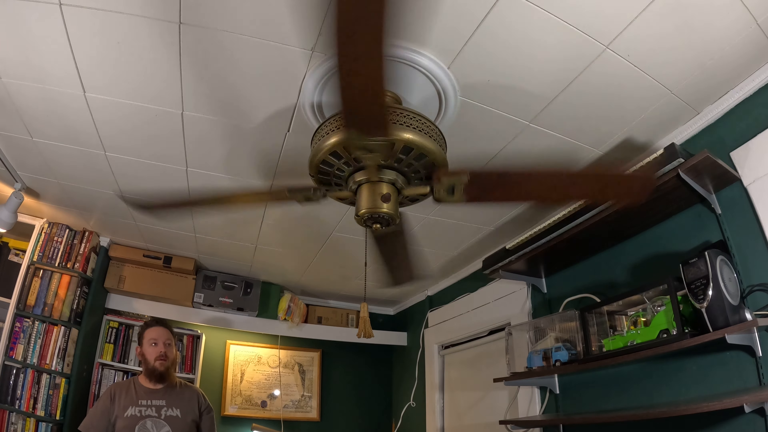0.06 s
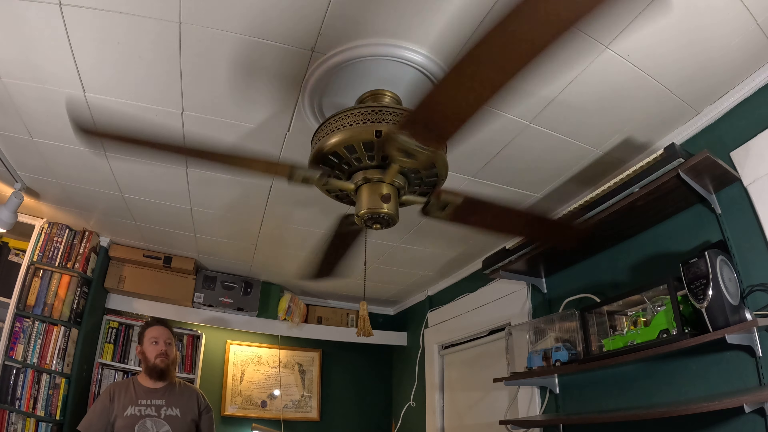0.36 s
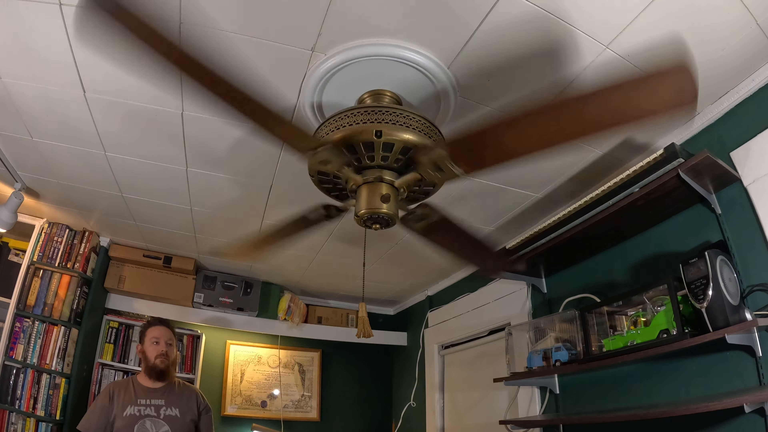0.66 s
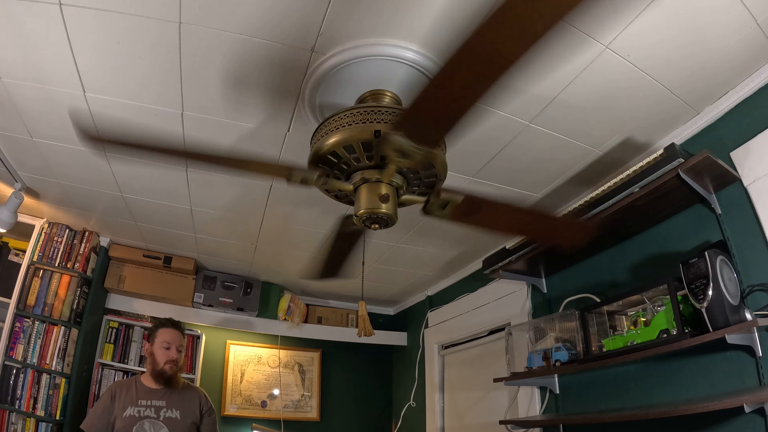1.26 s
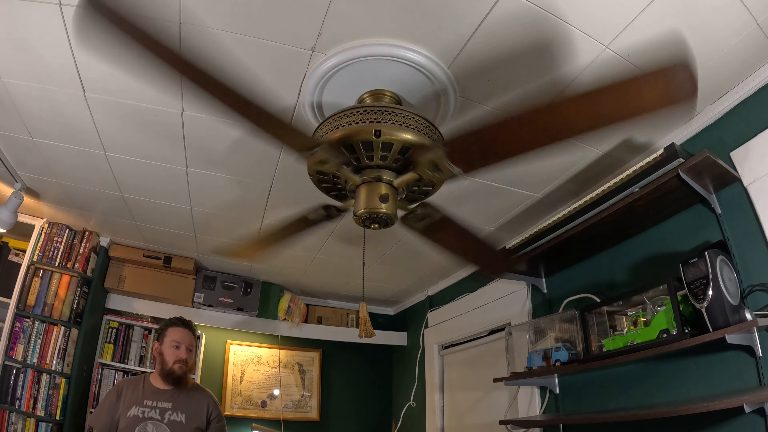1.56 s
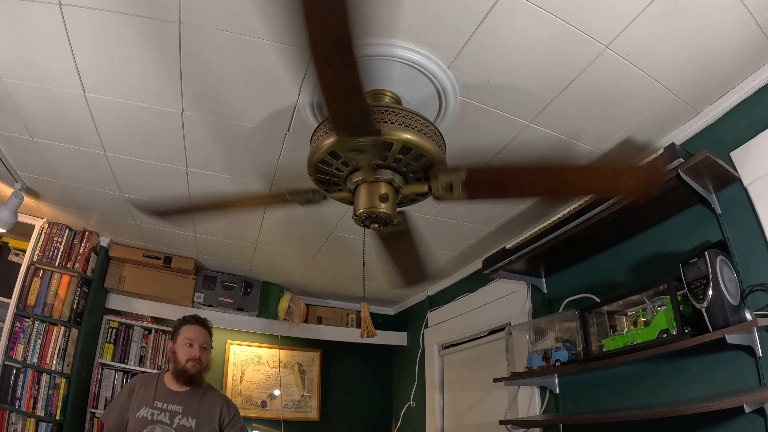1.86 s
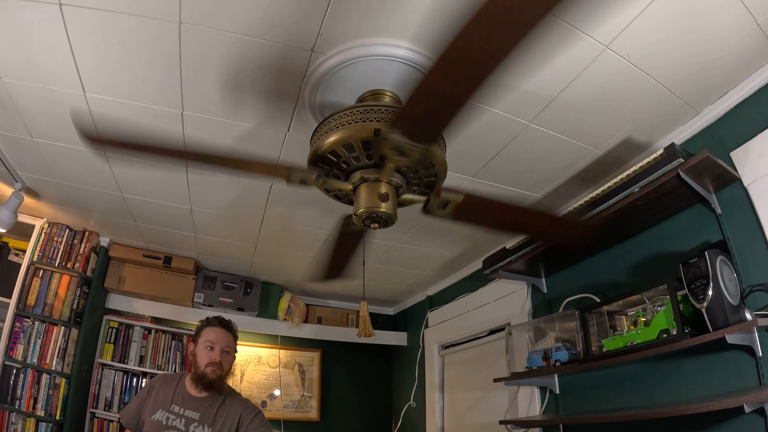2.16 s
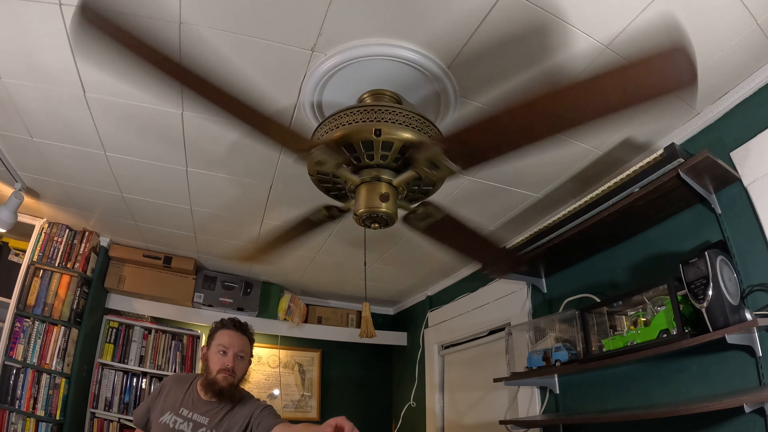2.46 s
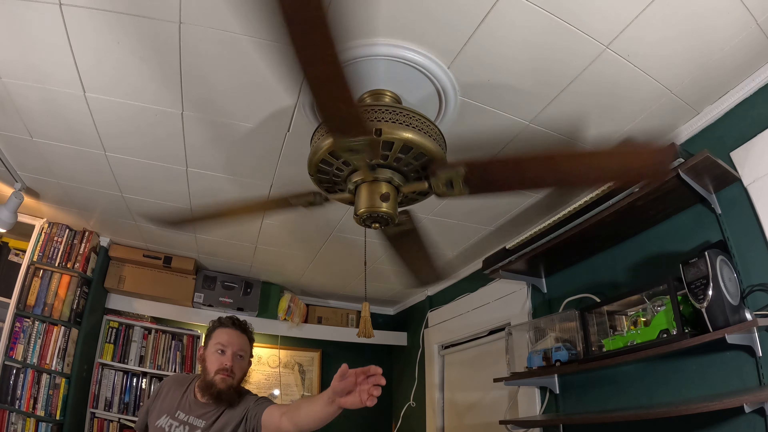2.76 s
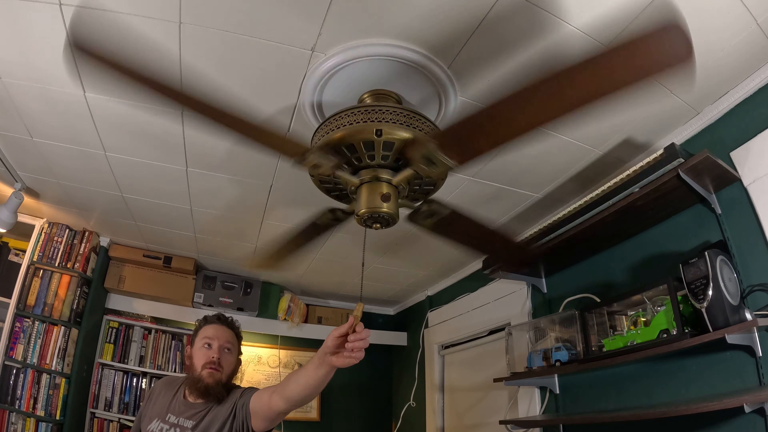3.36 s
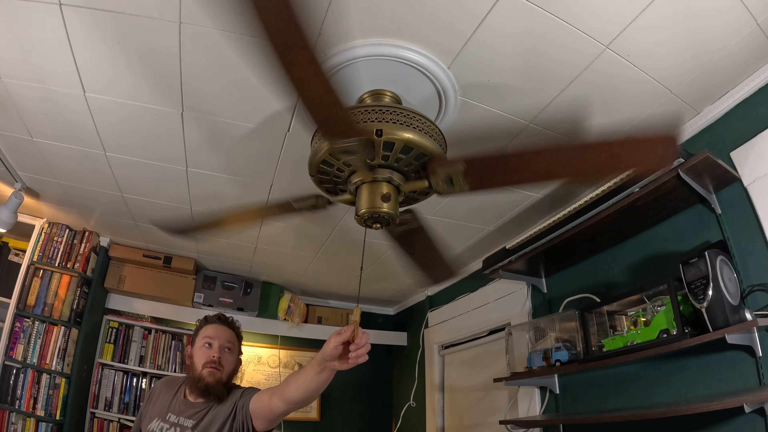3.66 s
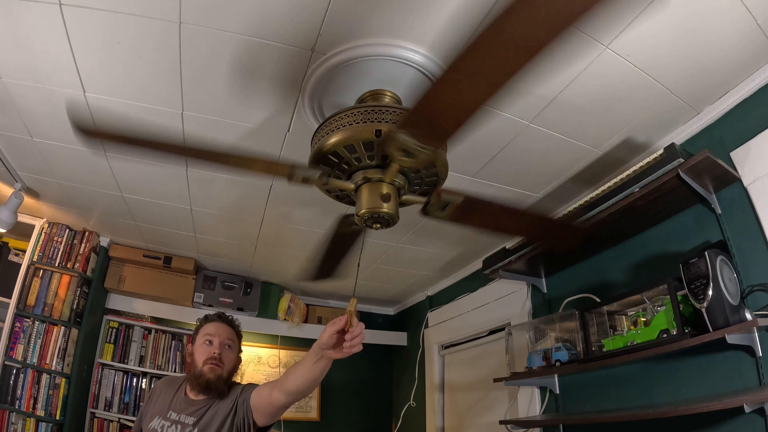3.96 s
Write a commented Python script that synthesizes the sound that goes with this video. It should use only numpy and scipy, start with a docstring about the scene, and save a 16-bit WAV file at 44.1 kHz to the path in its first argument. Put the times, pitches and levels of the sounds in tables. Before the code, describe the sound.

A ceiling fan whooshes steadily throughout, close overhead in a small room, with a fluttering low throb, light air buffeting and a faint motor hum. Around 2.5 seconds comes a soft, low bump with a very faint brush of cloth. From about 3.7 seconds a bead pull chain rattles lightly. Its switch clicks sharply at 3.8 seconds with a brief metallic ring, then snaps back just before 4 seconds.

```python
"""A small room, just under a steadily turning five-bladed ceiling fan. Each blade pushes a pressure
wave and a swish of air past the microphone, over a faint motor hum. A sleeve brushes and something
bumps softly as an arm is raised; the bead chain rattles taut, and the pull switch clicks in and
snaps back, ringing its brass housing."""
import sys
import numpy as np
from scipy import signal
from scipy.fft import rfft, irfft, next_fast_len
from scipy.io import wavfile
from scipy.ndimage import map_coordinates

SR = 44100
rng = np.random.default_rng(int(sys.argv[2]) if len(sys.argv) > 2 else 0)


def dump(signal):
    """Clip the signal to [-1, 1] and save it as 16-bit WAV at the path in sys.argv[1]."""
    limited = np.clip(np.atleast_2d(signal).T, -1, 1)
    pcm = np.round(limited * 32767).astype(np.int16)
    wavfile.write(sys.argv[1], SR, pcm)


N = 176400

BLADES, BLADE_PASS_HZ, FIRST_PASS_S = 5, 12.256, .017


# Stereo tilt of the fan: (frequency [Hz], left over right [dB])
FAN_TILT = [(60, 1), (180, 1.0), (530, 0), (1560, 1), (4640, 0.5), (13800, 9)]

def fan():
    """The whole fan: air moved by the blades over the motor, leaning left in the treble."""
    mix = motor() + pressure_wave() + moving_air() + hiss() + eddies()
    return filtered(mix, lambda hz: amp(along(FAN_TILT, hz) * np.array([[.5], [-.5]])))


# Partials of the throb: (multiple of the blade rate, level [dB])
THROB_PARTIALS = [(1, -34.5), (2, -100), (4, -52.5)]
# Fader ride on the throb: (time [s], gain [dB])
THROB_RIDE = [(0, 3), (.35, -13), (.8, 0.5), (1.1, -11.5), (1.4, -2.5), (1.7, -20.5), (1.97, -0.5),
              (2.35, -1), (2.7, -6.5), (2.9, -1), (3.7, -5), (4, -7.5)]

def pressure_wave():
    """Each passing blade pushes a pressure wave: a sub-bass throb."""
    throb = sum(amp(db) * np.sqrt(2) * np.cos(k * blade_phase()) for k, db in THROB_PARTIALS)
    return ride(THROB_RIDE) * throb


# EQ of the low buffet, the mid downwash and the brighter swish: (frequency [Hz], gain [dB])
BUFFET_EQ = [(15, 2.5), (28, 4.5), (50, 0.5), (80, -1.5), (130, -8.5), (250, -9.5), (600, -60),
             (2000, -120)]
WASH_EQ = [(40, -5), (110, -2.5), (180, -1), (290, 1), (325, -0.5), (410, -1.5), (550, -5.5), (680, -14),
           (1100, -43), (2500, -63), (6000, -120)]
SWISH_EQ = [(250, -5.5), (500, 1), (700, -3), (950, -0.5), (1250, -4.5), (1600, -11), (2230, -15.5),
            (2700, -23.5), (4000, -37), (9000, -63), (13000, -120)]
# Fader rides, gusts on the buffet and slow drift on all three: (time [s], gain [dB])
GUST_RIDE = [(0, -3), (.75, -1), (1.3, -0.5), (1.7, 0.5), (2.1, -4), (2.55, 3.5), (3.05, -6.5), (3.45, 0.5),
             (3.8, 3.5), (4, 3.5)]
DRIFT_RIDE = [(0, 1.9), (1.1, 0.5), (1.4, 1.5), (2, 1), (3.2, 0.8), (3.9, 0)]

def moving_air():
    """Air buffets the microphone, washes down from the blades and swishes off their tips."""
    buffet = airflow(BUFFET_EQ, db=-43, swing_db=1, lag_s=.033, turn_db=0, rough_db=1.4, stereo_db=2.5)
    wash = airflow(WASH_EQ, db=-46, swing_db=1.25, lag_s=.016, turn_db=-.07, rough_db=.48)
    swish = airflow(SWISH_EQ, db=-56.5, swing_db=1.5, lag_s=.026, turn_db=.57, rough_db=2.2)
    return ride(DRIFT_RIDE) * (ride(GUST_RIDE) * buffet + wash + swish)


# Puffs of air: (time [s], level [dB], band centre [Hz])
EDDY_PUFFS = [(0.296, -57, 935), (0.701, -47.5, 430), (0.937, -48, 840), (1.088, -40.5, 350),
              (1.368, -36.5, 288), (1.204, -39.5, 110), (1.615, -35.5, 106), (2.143, -45, 426),
              (2.581, -50, 875), (2.654, -49, 355), (2.741, -54.5, 1010), (2.815, -56.5, 1050),
              (3.058, -38.5, 305), (3.288, -38.5, 357), (3.45, -37, 314)]

def eddies(width_s=.005, width_octaves=.45):
    """Now and then a blade cuts an eddy with a short, soft puff."""
    puffs = np.zeros(N)
    for at, db, centre_hz in EDDY_PUFFS:
        envelope = bell((clock() - at) / width_s)
        band = lambda hz: bell(np.log2((hz + 1) / centre_hz) / width_octaves)
        puff = envelope * filtered(rng.standard_normal(N), band)
        puffs += amp(db) * puff * np.linalg.norm(envelope) / np.linalg.norm(puff)
    return puffs


# EQ of the hiss: (frequency [Hz], gain [dB])
HISS_EQ = [(300, 8), (1200, 17.5), (2200, 13.5), (2700, 5), (3400, 2.5), (4300, 1.4), (7400, 0),
           (8600, -6.5), (10700, -14.5), (11900, -11), (13000, -28), (15000, -25)]
# Fader ride on the hiss: (time [s], gain [dB])
HISS_RIDE = [(0, 1), (.44, 2.5), (.52, 3.5), (.6, 1.5), (1.15, 1.5), (2.1, 2.5), (2.35, 3.5), (3.5, 3.5)]

def hiss():
    """The airy top end of the fan, fluttering lightly with the blades."""
    air = airflow(HISS_EQ, db=-69, swing_db=.5, lag_s=.0016, turn_db=.3, rough_db=.93)
    return ride(HISS_RIDE) * air


# Click in, snap back: (time [s], level [dB], ring send [dB])
SWITCH_SNAPS = [(3.8005, -23.5, -11.5), (3.9882, -20, -31)]
# One EQ a snap, full going in and thinner springing back: (frequency [Hz], gain [dB])
CRACK_EQS = [
    [(250, 10), (700, 0), (1500, 5.5), (2400, 0.5), (3200, 6.5), (4300, 0.5), (4900, 3), (6000, -5.5),
     (7100, 2), (7700, -13), (8400, -3), (9100, -11), (9850, -0.5), (10700, -5.5), (12500, -13),
     (14000, -23)],
    [(250, -16), (800, -5), (1500, 3.5), (2250, -5), (3000, 11.5), (3900, 0.5), (4700, -12), (5150, 1.5),
     (5700, -9), (6700, -2), (7700, -3), (8400, -1.5), (9400, -12), (10300, -4), (11800, -3), (14000, -17)],
]
# Modes of the brass housing: (frequency [Hz], gain [dB], t60 [s])
HOUSING_MODES = [(550, 7.5, .1), (808, -10, .09), (1222, -6.5, .11), (1715, -2.5, .09), (2055, -10, .09),
                 (3110, -4.5, .09), (3225, -6.5, .09), (4030, -6, .09), (4985, -13, .1), (5383, -15, .1),
                 (6390, -15, .08), (7030, -11, .1), (8430, -19, .09)]

def switch(impact_db=-2, impact_t60=.0025, rattle_db=-4, rattle_t60=.015, ring_attack_s=.0049):
    """Each snap of the ratchet cracks, a hard impact with a short rattle, and rings the housing."""
    t, cracks, rings = clock(), np.zeros(N), np.zeros(N)
    for (at, db, ring_db), eq in zip(SWITCH_SNAPS, CRACK_EQS):
        envelope = amp(impact_db) * dying(at, impact_t60) + amp(rattle_db) * dying(at, rattle_t60)
        cracks += amp(db) * coloured(envelope * rng.standard_normal(N), eq)
        attack = 1 - np.exp(-np.abs(t - at) / ring_attack_s)
        for hz, mode_db, t60 in HOUSING_MODES:
            gain = amp(db + ring_db + mode_db + rng.normal(0, 1))
            tone = np.sin(2 * np.pi * (hz * (t - at) + rng.random()))
            rings += gain * attack * dying(at, t60) * tone
    return cracks, rings


# Beads slipping over the rim of the switch: (time [s], level [dB], scrape relative to tick [dB])
BEAD_TICKS = [(3.6612, -59, -4), (3.6921, -57.5, -18), (3.7345, -58.5, 0), (3.74, -44, -17),
              (3.7622, -44.5, -19), (3.787, -44, -18), (3.9194, -49, -32), (3.9424, -48.5, -22),
              (3.9546, -48, -24), (3.9694, -42, -19)]
# Chain sliding under tension: (start [s], end [s], final level [dB])
CHAIN_SLIDES = [(3.682, 3.814, -57.5), (3.932, 4, -47.5)]
# EQ of one bead's scrape, and the rasp over the whole chain: (frequency [Hz], gain [dB])
SCRAPE_EQ = [(3000, -25), (4200, -6), (4500, 0), (5300, -5), (7000, -22), (12000, -45)]
RASP_EQ = [(800, -25), (1600, 3), (2600, -6), (3300, 2.5), (3900, -1), (4600, 3), (5600, 3.5), (7100, 3),
           (7750, -6), (8450, -2), (9200, -8), (10300, -4), (11200, -10), (11950, -5), (12700, -11),
           (15000, -28)]

def chain(tick_t60=.012, scrape_t60=.03, crescendo_db=17.5, grains_per_s=2300):
    """Beads tick and scrape over the rim, with a fine grating that grows as the chain tightens."""
    t, contacts = clock(), []
    scrape_noise = coloured(rng.standard_normal(N), SCRAPE_EQ)
    for at, db, scrape_db in BEAD_TICKS:
        tick = dying(at, tick_t60) * rng.standard_normal(N)
        scrape = amp(scrape_db) * dying(at, scrape_t60) * scrape_noise
        contacts.append(amp(db) * (tick + scrape))
    for start, end, db in CHAIN_SLIDES:
        grains = unit(rng.standard_normal(N) * (rng.random(N) < grains_per_s / SR))
        slack = np.clip((end - t) / (end - start), 0, 1)
        contacts.append((t > start) * (t < end) * amp(db - crescendo_db * slack) * grains)
    rattle = sum(room(contact, wet_db=3, coherence=.38) for contact in contacts)
    return np.array([coloured(channel, RASP_EQ) for channel in rattle])


def bump(at_s=2.495, width_s=.0025, db=-27):
    """One soft, low push as the arm starts to move."""
    offset = (clock() - at_s) / width_s
    return amp(db) * (1 - offset ** 2) * bell(offset)


# EQ of the cloth: (frequency [Hz], gain [dB])
CLOTH_EQ = [(1500, -1), (3000, -3), (6500, 2), (9000, -3), (12000, -7), (14500, -24)]

def sleeve(start_s=2.474, rise_s=.032, end_s=2.615, fall_s=.063, db=-67.5, dull_hz=9000):
    """A brief brush of cloth as the arm goes up, growing duller as it slows."""
    t, bright = clock(), stereo_noise(CLOTH_EQ)
    dull = filtered(bright, lambda hz: 1 / (1 + (hz / dull_hz) ** 4))
    slowed = np.clip((t - start_s) / (end_s - start_s), 0, 1)
    envelope = np.clip((t - start_s) / rise_s, 0, 1) * np.clip((end_s - t) / fall_s, 0, 1)
    return amp(db) * envelope * ((1 - slowed) * bright + slowed * dull)


# Partials of the hum: (frequency [Hz], level [dB])
HUM_PARTIALS = [(120, -63), (180, -60.5), (240, -63.5), (1200, -80)]
# Narrow band of the whine: (frequency [Hz], gain [dB])
WHINE_EQ = [(3000, -60), (3800, -16), (3920, 0), (4000, 0), (4120, -16), (5000, -60), (6000, -120)]
# Fader ride on the whine: (time [s], level [dB])
WHINE_RIDE = [(.95, -86.5), (1.1, -95)]

def motor(waver_db=4.8, wavers_per_s=3.8):
    """The motor's faint bed: a hum whose partials waver in level, and a thin whine."""
    hum = np.zeros(N)
    for hz, db in HUM_PARTIALS:
        gain = amp(db + waver_db * wobble(wavers_per_s))
        hum += gain * np.sqrt(2) * np.sin(2 * np.pi * (hz * clock() + rng.random()))
    return hum + ride(WHINE_RIDE) * stereo_noise(WHINE_EQ)


# Reverb time of the room: (frequency [Hz], t60 [s])
ROOM_DECAY = [(300, 0.14), (1000, 0.19), (3000, 0.15), (7000, 0.17), (14000, 0.16)]

def room(dry, wet_db, coherence, predelay_s=.0025):
    """Ceiling and shelves answer with a short, dense tail, a fresh one for each sound."""
    hz, t, noise = signal.stft(rng.standard_normal((2, SR // 4)), SR, nperseg=256)
    decay = amp(-60 * t / along(ROOM_DECAY, hz)[:, None])
    mid, side = signal.istft(noise * decay, SR, nperseg=256)[1]
    spread = np.arccos(coherence) / 2
    tail = np.cos(spread) * mid + np.sin(spread) * np.array([side, -side])
    tail = np.pad(tail / np.linalg.norm(tail[0]), ((0, 0), (int(predelay_s * SR), 0)))
    onset = np.argmax(np.abs(dry) > 1e-9)
    wet = signal.fftconvolve(dry[None, onset:], tail, axes=1)[:, :N - onset]
    return dry + amp(wet_db) * np.pad(wet, ((0, 0), (onset, 0)))


def airflow(eq, db, swing_db, lag_s, turn_db, rough_db, stereo_db=0):
    """Noise that swells lag_s behind each blade, a little once a turn, and at random."""
    phase = blade_phase() - 2 * np.pi * BLADE_PASS_HZ * lag_s
    swell_db = swing_db * np.cos(phase) + turn_db * np.cos(phase / BLADES - np.pi / 3)
    swell_db += rough_db * wobble(40)
    gusts_db = stereo_db * np.array([wobble(30.05), wobble(30)])  # left and right gust separately
    return amp(db) * unit(amp(swell_db + gusts_db) * stereo_noise(eq))


# Stereo image of the noise layers: (frequency [Hz], left-right coherence [0-1])
NOISE_COHERENCE = [(60, 1), (130, 1), (280, 0.94), (620, 0.8), (1340, 0.69), (2900, 0.45), (6300, 0.7),
                   (13800, 0.12)]

def stereo_noise(eq):
    """Equalised noise of rms 1, nearly mono in the bass."""
    def response(hz):
        spread = np.arccos(np.clip(along(NOISE_COHERENCE, hz), -1, .995)) / 2
        return amp(along(eq, hz)) * [np.cos(spread), np.sin(spread)]
    mid, side = filtered(rng.standard_normal((2, N)), response)
    return unit(np.array([mid + side, mid - side]))


def blade_phase():
    """Radians of the blade cycle, zero as a blade passes."""
    return 2 * np.pi * BLADE_PASS_HZ * (clock() - FIRST_PASS_S)


def coloured(x, eq, size=2048):
    """Minimum-phase EQ: no pre-ring, and white noise keeps its power."""
    gain = unit(amp(along(eq, np.fft.rfftfreq(size, 1 / SR))))
    cepstrum = irfft(np.log(gain + 1e-6))
    cepstrum[1:size // 2] *= 2
    cepstrum[size // 2 + 1:] = 0
    return signal.fftconvolve(x, irfft(np.exp(rfft(cepstrum))))[:N]


def filtered(x, response):
    """Filter x by a function of frequency."""
    size = next_fast_len(N + SR // 2)
    return irfft(rfft(x, size) * response(np.fft.rfftfreq(size, 1 / SR)), size)[..., :N]


def dying(start, t60):
    """Sudden onset, exponential decay."""
    age = clock() - start
    return (age >= 0) * amp(-60 * np.abs(age) / t60)


def wobble(rate):
    """A smooth random curve, rate knots a second."""
    return map_coordinates(rng.standard_normal(int(N * rate / SR) + 4), [clock() * rate])


def ride(points):
    """Fader curve through (time [s], gain [dB]) points."""
    return amp(np.interp(clock(), *np.transpose(points)))


def along(points, hz):
    """Read (frequency [Hz], value) points on a log axis."""
    knots_hz, values = np.transpose(points)
    return np.interp(np.log(hz + 1), np.log(knots_hz + 1), values)


def bell(x):
    """Gaussian of height 1."""
    return np.exp(-.5 * x ** 2)


def amp(db):
    """Decibels to gain."""
    return 10 ** (np.asarray(db) / 20)


def unit(x):
    """Scale to rms 1."""
    return x / np.sqrt(np.mean(x ** 2) + 1e-20)


def clock():
    """Time of every sample."""
    return np.arange(N) / SR


def scene(pull_pan_db=.5):
    """The fan overhead and the arm going up, with chain and switch a touch left of centre."""
    cracks, rings = switch()
    pull = chain() + room(cracks, wet_db=0, coherence=.29) + room(rings, wet_db=-16, coherence=0)
    pan = amp(pull_pan_db * np.array([[1], [-1]]))
    return fan() + sleeve() + bump() + pan * pull


def record(dry):
    """Sound reaches the left side of the microphone a little late; the very top is cut off."""
    left_lag_s, top_hz = 1.5e-5, 14400
    delays_s = left_lag_s * np.array([[.5], [-.5]])
    return filtered(dry, lambda hz: (hz < top_hz) * np.exp(-2j * np.pi * hz * delays_s))


dry = scene()
out = record(dry)
dump(out)
```